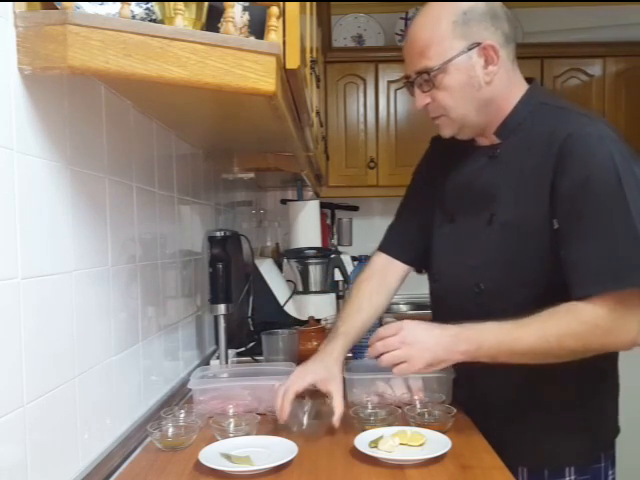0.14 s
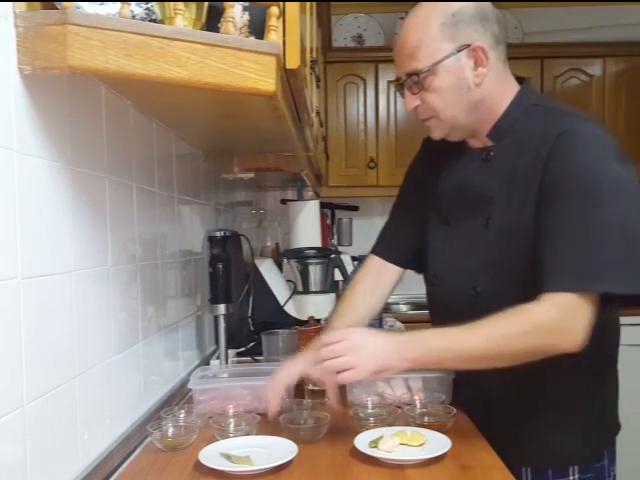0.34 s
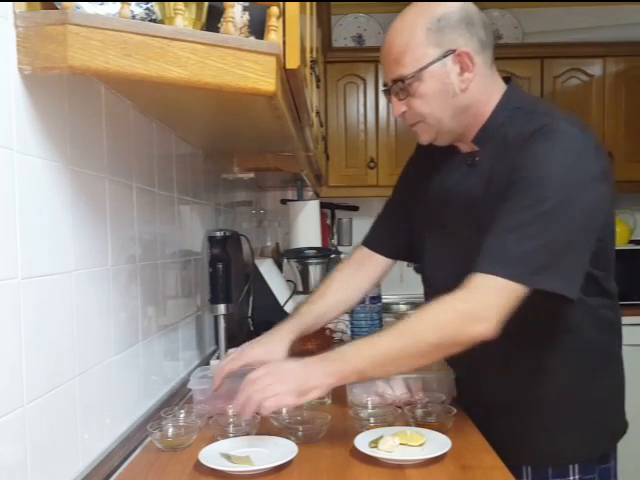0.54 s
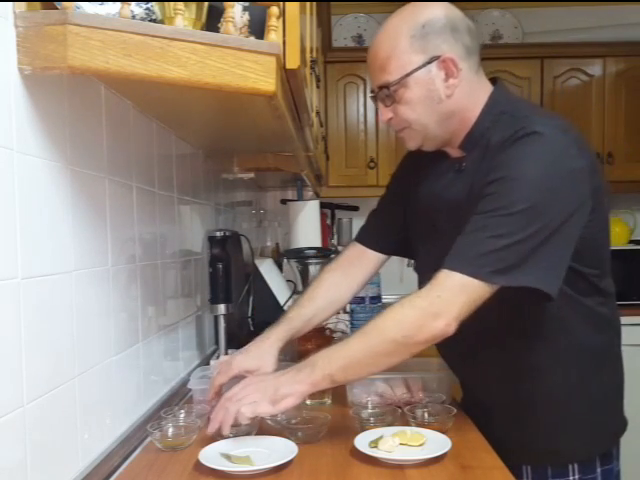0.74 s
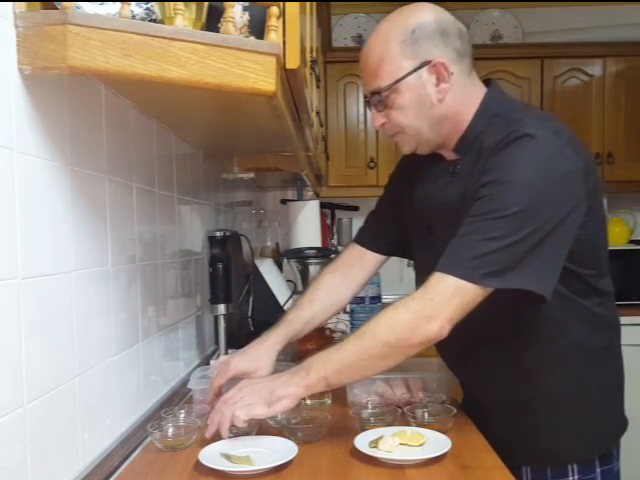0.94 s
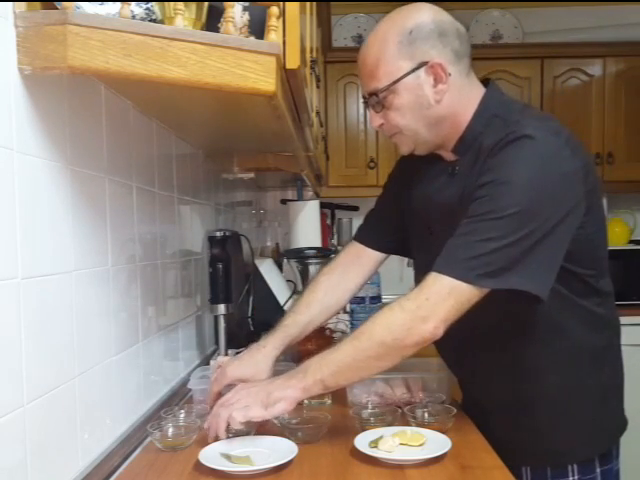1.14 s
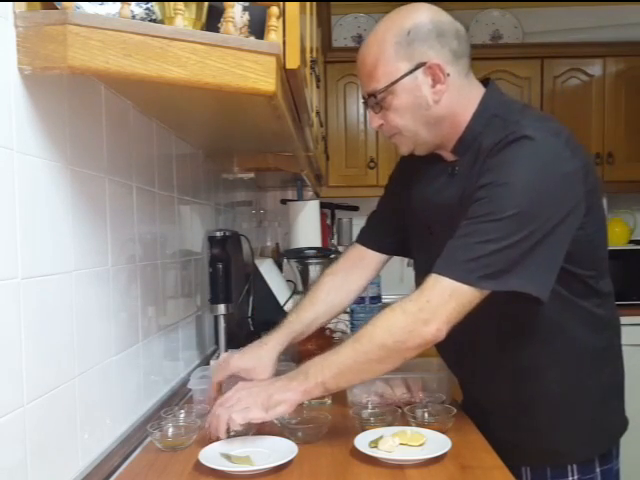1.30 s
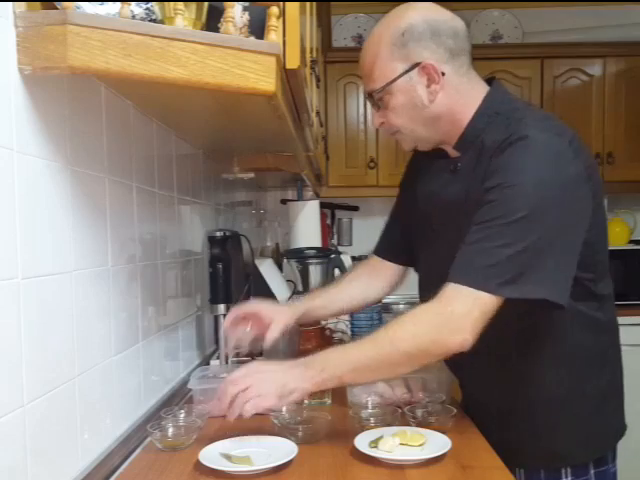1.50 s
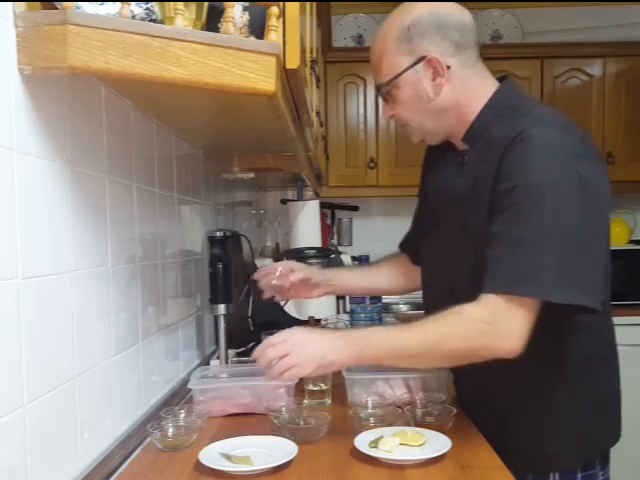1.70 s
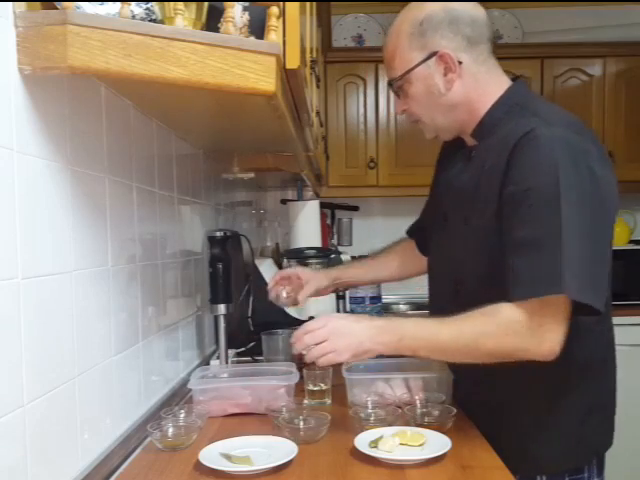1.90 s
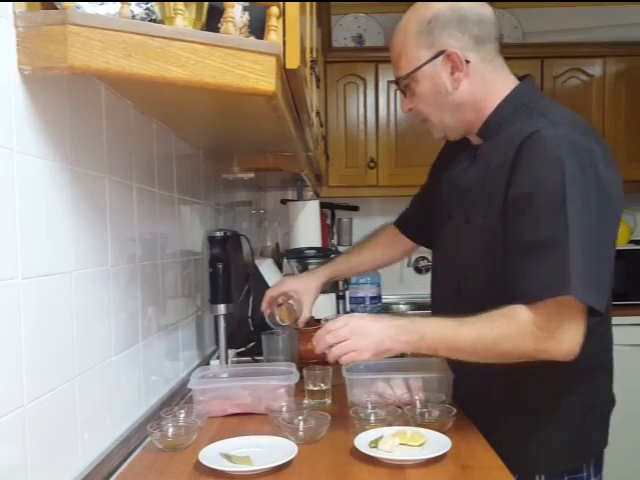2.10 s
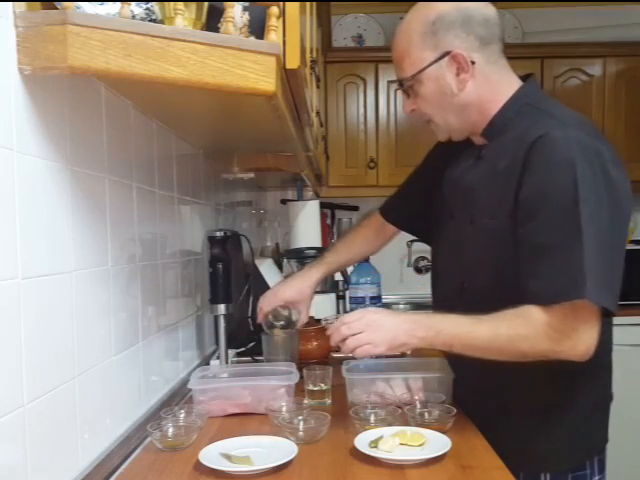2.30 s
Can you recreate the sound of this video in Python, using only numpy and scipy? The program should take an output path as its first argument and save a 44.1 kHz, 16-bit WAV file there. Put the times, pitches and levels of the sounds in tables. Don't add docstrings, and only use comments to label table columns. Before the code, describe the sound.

Small glass bowls knock on a wooden counter in a tiled kitchen. A loud, hollow crack at 0.23 seconds as one is set down; a soft nudge at 0.6, then a dense clinking shuffle from 0.83 to 1.14, and a single knock at 1.22 as one is lifted. Only faint refrigerator hum and airy hiss follow, until two weak, dull taps on a jug near 2.24 and 2.3.

```python
import sys
import numpy as np
from scipy import signal
from scipy.fft import rfft, irfft, next_fast_len
from scipy.io import wavfile
from scipy.ndimage import uniform_filter1d, map_coordinates

SR = 44100
rng = np.random.default_rng(int(sys.argv[2]) if len(sys.argv) > 2 else 0)


def unload_audio(sound):
    columns = np.transpose(np.atleast_2d(sound))
    steps = np.round(np.clip(columns, -1, 1) * 32767)
    wavfile.write(sys.argv[1], SR, steps.astype(np.int16))


def decibels_to_gain(level_db):
    exponent = np.asarray(level_db, float) / 20
    return 10 ** exponent


N = 103635

# f/Hz, density/dB per Hz
AIR_COLOUR = [(28, -22), (75, -26.5), (110, -21), (330, -16), (700, -21.5), (2000, -33), (10000, -45),
              (13500, -65)]
AIR_DB = -52
# f/Hz, rms level/dB, wobble/dB
MOTOR_TONES = [(60.7, -68, 1.5), (185.4, -74, 4.0), (302.6, -61, 0.73), (435, -71.5, 5.1), (1875, -82, 1.3)]
# t/s, level/dB
STIR = [
    (0, 3),
    (.45, 3.5),
    (.58, 5.5),
    (1.5, 0.5),
    (1.65, 2),
    (1.821, 4),
    (1.9, 1.5),
    (2.35, -1),
]

# t/s, peak level/dB, extra bass/dB, extra treble/dB
SET_DOWN = [
    (0.234, -2.5, -1, -0.5),
]
NUDGES = [
    (0.622, -15.5, 1.1, 0.39),
    (0.769, -47, 1.5, 3.2),
    (0.797, -46, 1.5, 1.5),
    (0.827, -21, 2.3, 1.3),
]
SHUFFLE = [(0.842, -17.5, 0.88, 11), (0.86, -9.5, 0.38, 4.5), (0.878, -39, 1.7, 1.5),
           (0.905, -14.5, 1.8, 2), (0.93, -17, 1.6, 1.7), (0.958, -15.5, 2.4, 0.91),
           (0.99, -11.5, 1.2, 0.78), (1.012, -27, 1.2, 1.2), (1.038, -7.5, 0.72, 0.83),
           (1.065, -14.5, 1.5, 0.89), (1.089, -16.5, 0.87, 1), (1.111, -30.5, 1.8, 1.5),
           (1.137, -33.5, 0.87, 1.5)]
LIFT = [
    (1.221, -10, 0.0069, 0.0052),
]
JUG_TAPS = [
    (2.235, -31.5, 1.3, 7.2),
    (2.297, -31, 1.2, 0.69),
]
# f/Hz, density/dB per Hz
SET_DOWN_COLOUR = [(60, -33.5), (170, -11), (450, -10), (1050, -3.5), (1900, -1.5), (3000, -17),
                   (6000, -37), (15000, -44)]
NUDGE_COLOUR = [(60, -8.5), (160, 1), (400, -8.5), (750, -15), (1400, -5.5), (2200, -32.5), (6000, -41.5),
                (15000, -56)]
SHUFFLE_COLOUR = [(160, -2.5), (500, -5.5), (1300, 8), (2100, 5.5), (3500, -15), (6500, -31), (9500, -42),
                  (14000, -34)]
LIFT_COLOUR = [(60, -11.5), (200, -18.5), (500, -8.5), (1100, -5), (2400, -6.5), (3400, -15.5),
               (5000, -15.5), (15000, -34.5)]
JUG_COLOUR = [(60, -28), (250, 2), (650, -19.5), (1100, -11), (2200, -18.5), (4400, -24), (8000, -28.5),
              (15000, -48.5)]

# f/Hz, level/dB, t60/s
COUNTER_HITS = [
    (.2343, -25),
]
COUNTER_MODES = [(176, -7.5, 0.12), (780, -3, 0.25), (865, -10, .15), (985, 1, .12), (1076, 5, 0.2),
                 (1320, -6, 0.083), (1512, 0.5, 0.21), (1646, 1.5, 0.055), (1730, -7, 0.0707),
                 (1840, -1.5, 0.13), (2203, -5, 0.11)]
NEAR_HITS = [
    (.843, -28.5),
    (.905, -33.5),
    (.935, -78),
    (1.01, -44.5),
]
NEAR_BOWL_MODES = [(3997, 0, .2), (4100, -3, .16), (7230, -16, .15), (7671, -23, .12), (8247, -21, .12),
                   (11960, -19, .25), (12040, -23, .2)]
FAR_HITS = [
    (.879, -28),
    (.931, -73),
]
FAR_BOWL_MODES = [(6998, 0, .21), (7171, -7, .3), (8463, -17, .15), (8812, -9, .25), (9001, -4, .2)]
STACK_HITS = [
    (.860, -22),
    (.895, -39),
    (.931, -21.5),
    (.989, -16.5),
    (1.038, -20),
    (1.09, -14.5),
]
STACK_MODES = [(1250, -12.5, 0.051), (1310, -11, 0.083), (592, -8, 0.022), (14120, -47, .1),
               (14260, -46.5, .06)]
LIFT_HITS = [
    (1.221, -31),
]
LIFTED_MODES = [(465.3, -6.5, 0.34), (900, -4.5, 0.17), (1100, 1, 0.085), (1510, -11, 0.13),
                (2517, 0, 0.15), (2896, 4.5, 0.063), (4190, -1, 0.085), (4380, -4.5, 0.05),
                (4810, -6.5, 0.1), (7140, 5, 0.027), (8650, -4, .03)]
RIM_HITS = [
    (2.236, -45),
]
RIM_MODES = [(581.7, 6.5, 0.1), (698, 4, 0.072), (760, -5, 0.074), (904, -1.5, 0.093), (1200, -11, 0.14),
             (1764, -6, 0.14), (2840, -13.5, 0.12), (3940, -10, .1), (4590, -13, 0.065), (3600, -14.5, .1),
             (5200, -14.5, .08), (3230, -16, .06), (4750, -19, .06)]
BELLY_HITS = [
    (2.3, -46),
    (2.3036, -45),
    (2.3072, -45),
    (2.3108, -46),
]
BELLY_MODES = [(148, -2, .1), (262, -18, .05), (704, -14, .08), (1195, -18, .15), (1640, -13, .15),
               (2865, -22, .12), (3530, -28, .08)]

# t/s, level/dB, f/Hz, t60/s, glide/(Hz/s)
FIRST_POP = [
    (.2343, -6, 1550, .02, 0),
]
POPS = [(0.244, -12, 1900, 0.079, -1), (0.241, -19, 1038, 0.12, 0), (0.246, -12, 1650, 0.027, -3),
        (0.265, -7, 1090, 0.034, 0), (.859, -13, 1394, .09, 3), (0.863, -16.5, 1200, 0.18, -0.5),
        (0.931, -7, 2080, 0.03, -8000), (.940, -12, 1380, 0.049, 2), (0.987, -19, 725, 0.0774, 4),
        (.998, -17.5, 1370, .05, 0), (1.038, -9, 1630, 0.041, -12000), (1.042, -16, 1240, 0.16, 1.5),
        (1.087, -22.5, 165, 0.14, -1), (0.861, -24, 164.9, .15, 0), (1.064, -21, 1600, .05, -0.5),
        (1.089, -15, 1331, 0.058, 0), (1.109, -21, 1148, 0.12, 4), (1.136, -28, 1339, 0.089, 5),
        (1.222, -23, 1976, 0.15, 22002), (1.223, -33, 1100, 0.1, -4.5), (1.244, -31, 1520, 0.057, -0.5),
        (1.255, -28, 900, 0.077, 0), (2.297, -41, 555, 0.11, 0), (2.304, -45, 147.9, 0.16, -3),
        (2.304, -29, 555, 0.1, 0), (2.309, -34.5, 555, 0.12, -7)]
# t/s, level/dB
CHATTER = [(0.861, -47), (0.894, -20), (0.932, -28), (.955, -30), (0.987, -27), (1.009, -28.5),
           (1.038, -37), (1.075, -31), (1.09, -23.5), (1.124, -40), (1.18, -34)]
CHATTER_HZ, CHATTER_T60_S = 1881, 0.24
POP_RISE_S = 0.0005

# f/Hz, t60/s
ROOM_T60 = [(100, 0.53), (300, .55), (1000, 0.48), (2500, .45), (6000, 0.43), (14000, 0.4)]
# f/Hz, correlation/1
LIKENESS = [(100, .98), (250, .94), (500, .75), (1000, 0.1), (4000, -.1), (12000, .05)]
# f/Hz, L minus R/dB
LEAN = [(60, 6.02), (250, 1.6), (1000, 3.5), (2500, 3.9), (7000, 1.8), (13000, 0.97)]
WET_DB, RING_WET_DB, JUG_WET_DB, POP_WET_DB = -16.5, -33.5, -30.5, -38.5
FIRST_ECHO_S, ECHO_UNEVEN_DB = 0.001, 2.58
EARLY_GAIN, EARLY_S = 1.5, .002
RIGHT_LAG_SAMPLES = 2
EDGES_HZ = 25 * 2 ** np.arange(0, 9.6, .5)
# f/Hz, level/dB
MIC_COLOUR = [(5000, -5.5), (7300, -8.5), (8200, -12.5), (10200, -13), (11500, -5.5), (14300, 9),
              (15100, 5), (15500, -24.5)]


def at_hz(points, hz):
    table_hz, values = np.array(points).T
    return np.interp(np.log(hz), np.log(table_hz), values)


def bands():
    return [(signal.butter(2, [low, high], "band", fs=SR, output="sos"), np.sqrt(low * high))
            for low, high in zip(EDGES_HZ, EDGES_HZ[1:])]


def spread(mid, side, hz):
    alike = np.clip(at_hz(LIKENESS, hz), -.99, .99)
    balance = decibels_to_gain(at_hz(LEAN, hz) * np.array([[.5], [-.5]]))
    return balance * (np.sqrt(1 + alike) * mid + np.sqrt(1 - alike) * side * [[1], [-1]])


def drift(rate_hz):
    knots = rng.standard_normal(200)
    return map_coordinates(knots, [5 + np.arange(N) / SR * rate_hz], order=3)


def causal(db):
    cep = irfft(db * np.log(10) / 20)
    cep[1:len(cep) // 2] *= 2
    cep[len(cep) // 2 + 1:] = 0
    return np.exp(rfft(cep))


def room(x, wet_db):
    t = np.arange(SR) / SR
    echoes = rng.standard_normal((2, 2, SR))
    echoes *= decibels_to_gain(ECHO_UNEVEN_DB * rng.exponential(1, (2, 2, SR)))
    early = 1 + EARLY_GAIN * np.exp(-t / EARLY_S)
    echoes *= decibels_to_gain(wet_db) * (t > FIRST_ECHO_S) * early / echoes.std()
    response = np.zeros((2, SR))
    for k, (sos, hz) in enumerate(bands()):
        dying = echoes[k % 2] * decibels_to_gain(-60 * t / at_hz(ROOM_T60, hz))
        mid, side = signal.sosfilt(sos, dying)
        response += spread(mid, side, hz)
    response[[0, 1], [0, RIGHT_LAG_SAMPLES]] += decibels_to_gain(np.array([1.5, -1.5]))
    size = next_fast_len(N + SR)
    return irfft(rfft(x, size) * rfft(response, size), size)[:, :N]


def refrigerator():
    t = np.arange(N) / SR
    white = rng.standard_normal((2, 2, N))
    air = np.zeros((2, N))
    for k, (sos, hz) in enumerate(bands()):
        mid, side = signal.sosfilt(sos, white[k % 2])
        air += decibels_to_gain(at_hz(AIR_COLOUR, hz) + 1.5 * drift(8.0)) * spread(mid, side, hz)
    tones = np.zeros(N)
    for hz, db, wobble_db in MOTOR_TONES:
        level = decibels_to_gain(db + 7.5 + wobble_db * drift(11.0))
        tones += level * np.sin(2 * np.pi * hz * t + 0.55 * drift(5.6))
    stir_db = np.interp(t, *np.transpose(STIR))
    return decibels_to_gain(AIR_DB - 3.5 + stir_db) * air / air.std() + tones


def knocks(events, colour, trim_db):
    hz = np.maximum(np.arange(2049) * SR / 4096, 20)
    out = np.zeros(N + 4096)
    for s, db, bass_db, treble_db in events:
        shift = at_hz([(45, bass_db - 15), (100, bass_db), (300, bass_db), (700, 0),
                       (2200, 0), (4000, treble_db)], hz)
        click = irfft(causal(at_hz(colour, hz) + shift))
        start = int(s * SR)
        out[start:start + len(click)] += click * decibels_to_gain(db + trim_db)
    return room(out[:N], WET_DB)


def ring(hits, modes):
    out = np.zeros(N)
    for hz, mode_db, t60_s in modes:
        clicks, sign = np.full(N, 1e-18), rng.choice([-1, 1])
        for s, db in hits:
            clicks[int(s * SR)] = decibels_to_gain(db + mode_db + rng.normal(0, 0.95)) * sign
        contact = int(SR / hz / 2) + 1
        push = uniform_filter1d(uniform_filter1d(clicks, size=contact), size=contact)
        r, w = 1e-3 ** (1 / (t60_s * SR)), 2 * np.pi * hz / SR
        out += signal.lfilter([.5, 0, -.5], [1, -2 * r * np.cos(w), r * r], push) * 4.45
    return out


def pops():
    t, out = np.arange(N) / SR, np.zeros(N)
    chatter = [(s, db, CHATTER_HZ, CHATTER_T60_S, 0) for s, db in CHATTER]
    for s, db, hz, t60_s, glide in FIRST_POP + POPS + chatter:
        age = np.maximum(t - s, 0)
        envelope = decibels_to_gain(db - 60 * age / t60_s) * (1 - np.exp(-age / POP_RISE_S))
        out += envelope * np.sin(2 * np.pi * (hz * t + glide * age ** 2 / 2))
    return out


def contacts():
    return (knocks(SET_DOWN, SET_DOWN_COLOUR, trim_db=20.5)
            + knocks(NUDGES, NUDGE_COLOUR, trim_db=16.5)
            + knocks(SHUFFLE, SHUFFLE_COLOUR, trim_db=11.5)
            + knocks(LIFT, LIFT_COLOUR, trim_db=12.5)
            + knocks(JUG_TAPS, JUG_COLOUR, trim_db=19.5))


def counter_and_pops():
    bodies = ring(COUNTER_HITS, COUNTER_MODES) + ring(LIFT_HITS, LIFTED_MODES)
    return room(pops() + bodies, POP_WET_DB)


def bowls():
    near, far = ring(NEAR_HITS, NEAR_BOWL_MODES), ring(FAR_HITS, FAR_BOWL_MODES)
    return room(near + far + ring(STACK_HITS, STACK_MODES), RING_WET_DB)


def jug():
    return room(ring(RIM_HITS, RIM_MODES) + ring(BELLY_HITS, BELLY_MODES), JUG_WET_DB)


def scene():
    return refrigerator() + contacts() + counter_and_pops() + bowls() + jug()


def roll_off(x):
    return signal.sosfilt(signal.butter(12, 15900, fs=SR, output="sos"), x)


def record(dry):
    size = 2 ** 17
    hz = np.maximum(np.arange(size // 2 + 1) * SR / size, 20)
    colour = causal(at_hz(MIC_COLOUR, hz))
    mix = irfft(rfft(dry, size) * colour)[:, :N]
    return roll_off(mix)


dry = scene()
out = record(dry)
unload_audio(out)
```